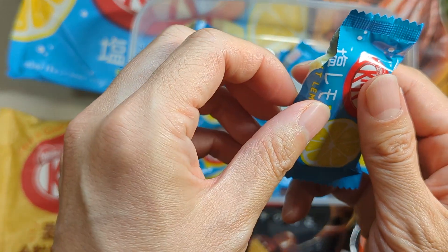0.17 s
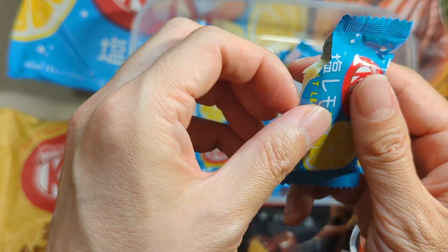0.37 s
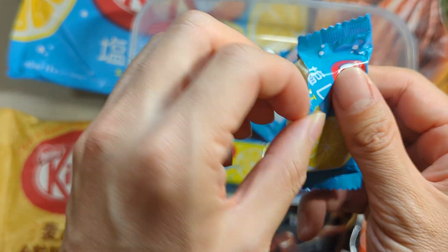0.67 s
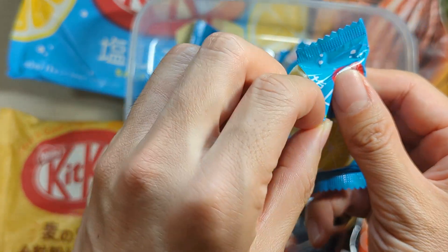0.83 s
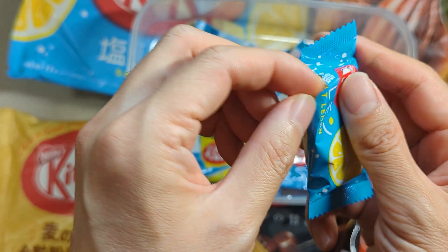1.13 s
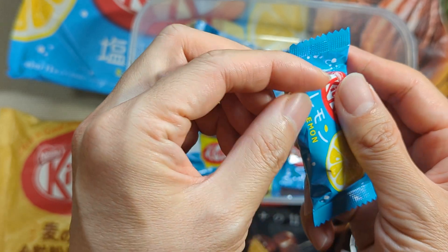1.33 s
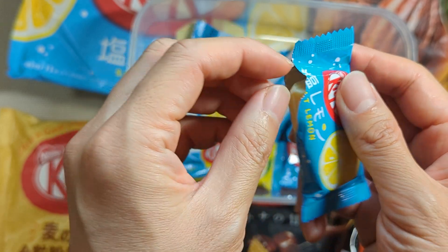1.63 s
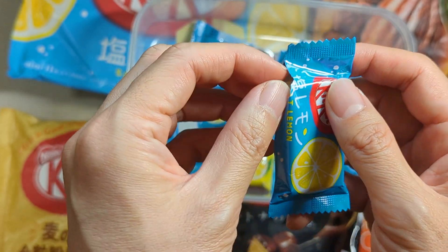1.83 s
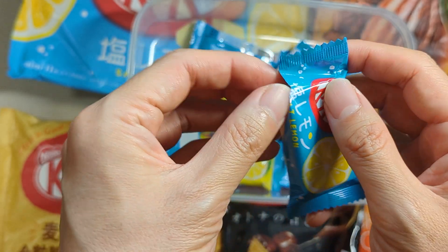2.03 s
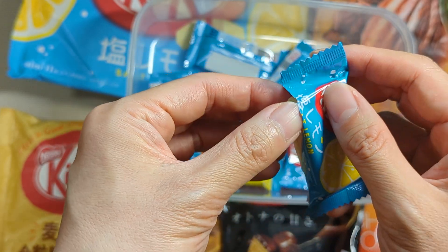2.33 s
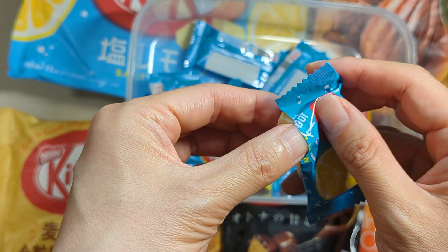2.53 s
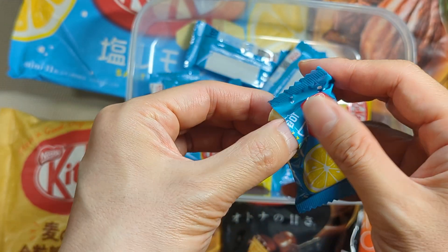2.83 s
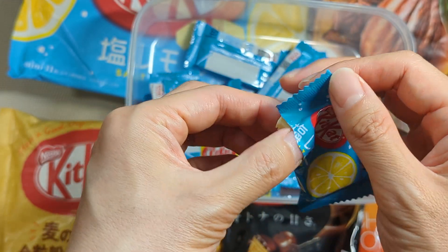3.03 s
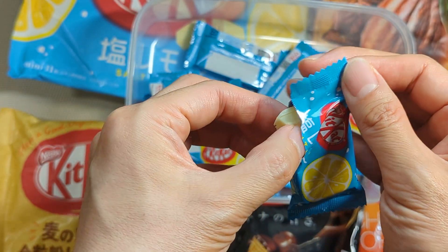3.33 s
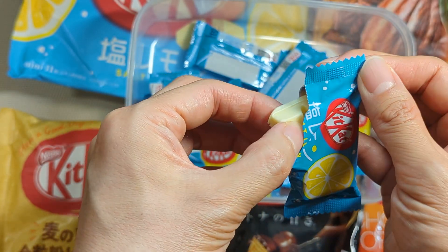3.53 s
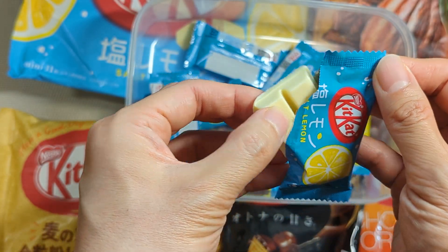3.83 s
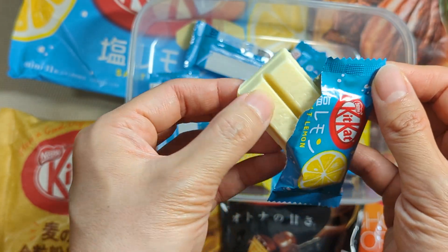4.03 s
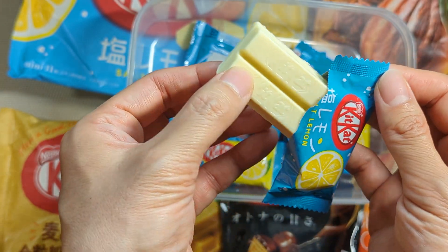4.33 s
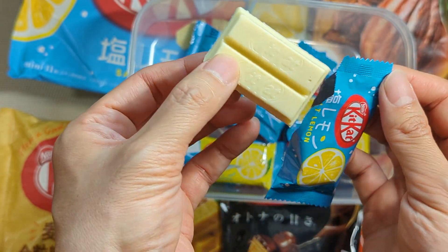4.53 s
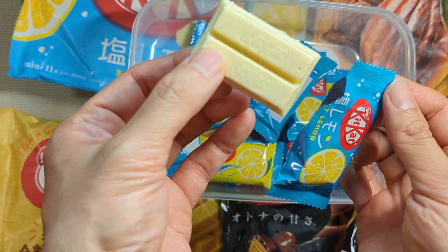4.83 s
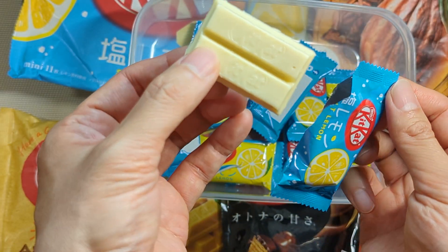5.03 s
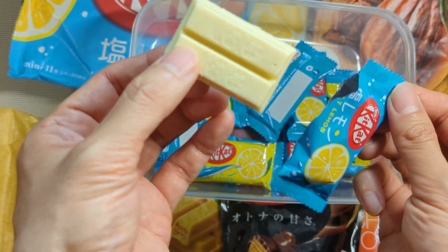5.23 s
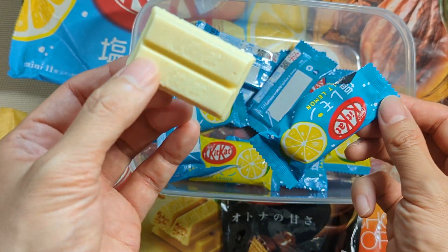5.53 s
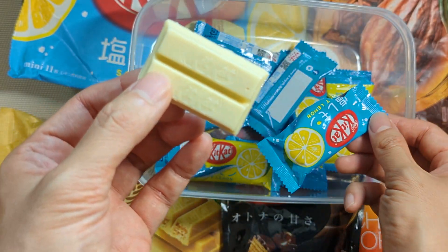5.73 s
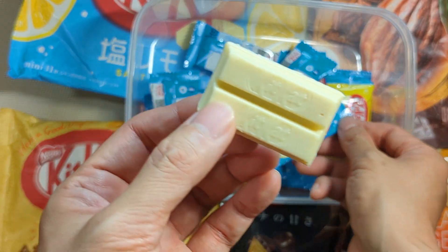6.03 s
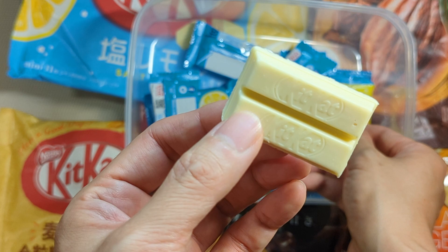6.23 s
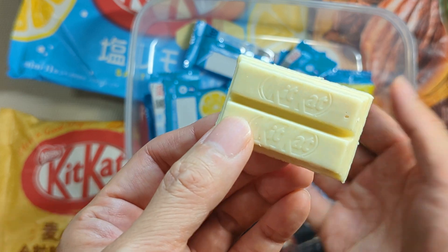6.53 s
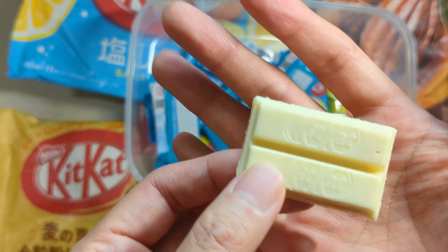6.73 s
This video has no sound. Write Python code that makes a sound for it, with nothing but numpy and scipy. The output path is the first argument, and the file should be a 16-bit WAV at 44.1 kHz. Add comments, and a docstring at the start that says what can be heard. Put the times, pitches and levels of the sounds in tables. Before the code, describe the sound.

A small plastic snack wrapper is handled close to a stereo microphone. For the first 1.4 seconds, fingers make light, irregular crinkles and crisp ticks, then ease off briefly. From about 2.1 seconds the film tears in short, raspy pulls, with two sharp, bright snaps near 2.5 seconds. Fine crackling continues and peaks in a cluster of loud snaps between 3.2 and 3.6 seconds. The crinkling grows duller and softer as the candy bar slides out, dying away by about 4.7 seconds. A single sharp crackle comes at 5.1 seconds and a smaller one near 5.9. Around 6.2 to 6.4 seconds the empty wrapper drops into a plastic box with a few snaps and a brief rustle. The room is small and dry, and a faint, low ventilation hum runs underneath, remaining alone at the end.

```python
"""Fingers tear open a small plastic snack wrapper close to a stereo microphone, slide the bar out and drop the wrapper into a box.
Creases in the film buckle with sharp snaps, each ringing its own little facet; tearing and sliding make a fine dense crackle.
Hands and table scatter the sound, and a small dry room with a low ventilation hum answers."""
import sys
import numpy as np
from scipy import signal
from scipy.fft import rfft, irfft, next_fast_len
from scipy.io import wavfile
from scipy.ndimage import uniform_filter1d

SR = 44100
rng = np.random.default_rng(int(sys.argv[2]) if len(sys.argv) > 2 else 0)


def to_wav(sig):
    """Store sig (one row per channel, or 1-D mono) as 16-bit WAV at the path in sys.argv[1].

    Samples outside -1..1 are clipped; the rate is SR.
    """
    pcm = np.clip(np.atleast_2d(sig), -1, 1) * 32767
    pcm = np.round(pcm).astype(np.int16)
    wavfile.write(sys.argv[1], SR, pcm.T)  # frames by channels


N = 303849

# the big creases buckle, and the wrapper knocks against the box and lands in it: (s, level dB, lowest Hz that
# the facet radiates, ring Hz, ring dB)
SNAPS = [(0.1597, -40, 3000, 5600, 11), (0.3443, -53, 700, 11000, 8), (0.3669, -31, 1250, 1900, 16), (0.4402, -47, 990, 11000, 10.5),
         (0.553, -44, 2406, 9100, 16.5), (0.5847, -34.5, 2700, 9700, 6), (0.6092, -32.5, 3500, 12200, 11),
         (0.6527, -38.5, 3850, 11300, 8), (0.6895, -48, 1800, 6500, 8), (0.734, -34.5, 1200, 6300, 2),
         (0.7382, -32.5, 630, 6250, 10), (0.7415, -36, 800, 750, 10), (0.757, -33, 1000, 1400, 21), (0.7816, -35.5, 675, 11900, 5),
         (0.8147, -36, 784, 11710, 18.5), (0.8575, -42.5, 1500, 1940, 17), (0.898, -40, 3240, 7000, 2.5),
         (0.9352, -47, 800, 12000, 10), (0.98, -36.5, 1480, 1650, 14), (1.0857, -30.5, 1200, 6440, 6.5), (1.0945, -30.5, 4370, 9220, 13), (1.1064, -36.5, 2800, 5930, 0),
         (1.231, -37.5, 1490, 9000, 17), (1.2612, -32.5, 882, 1570, 11.5), (1.3458, -33, 1120, 7730, 8.5),
         (1.4642, -43, 2080, 10400, 13.5), (1.7117, -50, 3025, 6900, 10), (1.777, -43, 920, 9700, 17),
         (2.113, -37.5, 770, 6310, 4.5), (2.1271, -34.5, 2284, 2200, 20), (2.1688, -34.5, 1050, 980, 7),
         (2.179, -33.5, 950, 980, 8), (2.1927, -33, 1000, 950, 9), (2.198, -32, 1000, 4200, 8), (2.2601, -34, 1482, 4470, 10.5),
         (2.3235, -37.5, 1770, 3726, 0), (2.3902, -43.5, 1765, 8890, 12), (2.4357, -34, 2680, 7310, 2),
         (2.4529, -16.5, 4930, 8500, 17), (2.4724, -18, 1600, 8500, 8), (2.886, -34.5, 3760, 7500, 3),
         (2.9159, -34, 2410, 8420, 22), (3.0022, -33, 1400, 3500, 9), (3.011, -38, 1300, 1250, 12), (3.0423, -36.5, 1400, 6690, 13),
         (3.0596, -32, 1506, 12000, 8.5), (3.1373, -43, 3910, 6700, 3), (3.1765, -35, 1106, 4560, 6.5),
         (3.2284, -25, 3400, 7500, 0), (3.28, -26.5, 2650, 11000, 8.5), (3.432, -14.5, 4490, 934, 4),
         (3.436, -17.5, 1500, 6140, 18), (3.4399, -20.5, 2060, 2390, 9), (3.5388, -19, 1592, 6800, 12.5),
         (3.6126, -24.5, 4150, 4530, 10.5), (3.6709, -36, 1150, 2420, 8.5), (3.6907, -35.5, 1328, 3990, 7),
         (3.723, -33, 4000, 4710, 4.5), (3.7411, -31, 3600, 3700, 5), (3.754, -34, 3264, 2580, 15),
         (3.777, -37.5, 2430, 2377, 2), (3.8213, -34, 1898, 2480, 1.5), (3.8412, -32.5, 1815, 6250, 0),
         (3.8859, -29, 2600, 2370, 8.5), (3.9046, -32, 2130, 7700, 4), (3.924, -32.5, 3955, 3850, 9),
         (4.0016, -25.5, 3300, 4100, 8.5), (4.069, -46.5, 1810, 3672, 13), (4.1302, -34.5, 3394, 3610, 16),
         (4.22, -41, 1690, 2830, 3), (4.365, -45, 2080, 3650, 7), (4.491, -49, 2470, 4090, 12),
         (4.5723, -50, 1520, 1840, 4), (4.714, -43.5, 2500, 4020, 6.5), (5.1035, -41.5, 2650, 4300, 13),
         (5.141, -22, 2700, 5530, 11), (5.64, -57, 2100, 5950, 6), (5.8635, -28.5, 2510, 10400, 18.5),
         (5.9003, -32, 1454, 4300, 0.5), (6.1869, -26, 1700, 7560, 17), (6.236, -45.5, 3000, 4100, 3.5), (6.2502, -20.5, 3400, 2450, 16), (6.2512, -39, 1200, 940, 18.5),
         (6.3094, -38, 1300, 5120, 4.5), (6.359, -49, 1600, 3103, 5.5)]
# colour of the fine crackle: (Hz, dB)
FILM = [(400, -17.5), (700, -8), (1000, -6.5), (1400, -6.5), (2000, -5), (2900, -7.5), (4000, -4), (5300, -9.5), (6500, -7), (8000, -8.5), (9200, -6.5), (12000, -11.5), (16000, -20.5)]
# room background: (Hz, dB per Hz)
AIR = [(22, -60), (31, -30), (46, -3), (60, -9.5), (100, 0), (135, -9.5), (200, -6.5), (255, -12.5), (350, -7), (450, -11), (700, -19), (1200, -28.5), (2500, -34.5), (6000, -39.5), (16000, -45)]
AIR_DB = -60.5
# ventilation hum: (Hz, dB)
HUM = [(92, -73), (161.5, -71.5), (333.5, -74)]
# the small dry room: decay (s) and level against the direct click (dB)
ROOM_T60_S, ROOM_DB = 0.15, -10
SPLIT_HZ = 4000  # fixed
TOP_HZ = 15900  # fixed
# body colour of the whole packet, shared by every facet: (Hz, dB)
PACKET = [(300, 5), (600, 3), (950, -1), (1300, -4.5), (1600, -2.5), (2100, 2.5), (2900, -2.5), (4000, 1), (5100, -0.5), (6200, 3), (8000, 1), (12000, 2.5), (16000, -1)]
# a harder snap is brighter, a facet that radiates low notes well has a flatter spectrum:
# the usual snap, and the change of tilt (dB per octave) per dB of level and per octave of the lowest Hz
USUAL_SNAP_DB, USUAL_LOW_HZ = -34, 2060
# lag of the right port (ms) as the wrapper moves from the hands down into the box, and its scatter between facets: (s, ms)
PORT_LAG = [(0, 0.056), (3.2, 0.045), (3.5, 0.028), (4.5, 0.072), (5.1, -0.042), (6.3, 0.023)]
LAG_SCATTER_MS = 0.024
# pulls that tear the film, slide it off the bar or brush it into the box: (start s, length s, level dB, crispness = treble minus body dB)
PULLS = [(0.191, 0.026, -80, 5), (0.309, 0.02, -77, 14), (0.475, 0.025, -83, 8), (0.565, 0.1, -77, 7), (0.746, 0.018, -66, 1),
         (0.821, 0.013, -70, 18), (0.935, 0.2, -66.5, 3), (1.189, 0.075, -60, 5), (1.74, 0.08, -71.5, 0), (1.777, 0.016, -60.5, 0),
         (1.871, 0.027, -79, 9), (2.001, 0.033, -78, -1), (2.109, 0.033, -58, -8), (2.158, 0.04, -49.5, -0.5), (2.263, 0.015, -55, -3),
         (2.326, 0.083, -59, -1.5), (2.496, 0.084, -62, -5.5), (2.678, 0.14, -69.5, -0.5), (2.818, 0.14, -61.5, 0.5), (2.921, 0.019, -60.5, 8),
         (2.99, 0.026, -48.5, -15.5), (3.042, 0.03, -60, 1.5), (3.18, 0.16, -64, 0.5), (3.415, 0.13, -58, -0.5), (3.59, 0.1, -65.5, 2),
         (3.724, 0.049, -59, -6), (3.888, 0.05, -58, 1.5), (4.019, 0.052, -64.5, -15.5), (4.129, 0.028, -65.5, -19.5), (4.345, 0.027, -68, -15),
         (6.265, 0.03, -56.5, -7.5), (6.309, 0.07, -68, -9)]
# each pull builds up and lets go by 20 dB in these times
PULL_ATTACK_S, PULL_RELEASE_S = 0.03, 0.065
# between pulls the held film stirs faintly, until the bar is out
HELD_DB, HELD_CRISP_DB, BAR_OUT_S = -81, -5.5, 4.65
TILT_DB = None
TILT_PER_DB, TILT_PER_OCTAVE = 0.305, 3.0
# usual tilt of a snap, bright while the film is taut and duller as it goes slack: (s, dB per octave)
FILM_TILT = [(0.1, -3.5), (1.1, -4), (2.2, -5), (3.2, -5), (3.7, -5.5), (4.3, -7.5), (5.5, -3.5), (6.3, -6)]
# small creases give way during the pulls: rate, level over the pull and its spread, ranges of the lowest Hz and the ring
SMALL_PER_S, SMALL_DB, SMALL_SPREAD_DB = 22, 16, 1.5
SMALL_LOW_HZ, SMALL_RING_HZ, SMALL_RING_DB = (900, 2800), (3000, 14000), 12.5


def undb(db):
    """Decibels to gain."""
    return 10 ** (np.asarray(db) / 20)


def unit(x):
    """Scale to rms 1."""
    return x / np.sqrt(np.mean(x ** 2))


def spectrum_db(points, hz):
    """Join (Hz, dB) points on a log-frequency axis."""
    at, db = np.transpose(points)
    return np.interp(np.log(hz + 1), np.log(at), db)


def colour(x, points):
    """Filter by a (Hz, dB) spectrum."""
    size = next_fast_len(N)
    return irfft(rfft(x, size) * undb(spectrum_db(points, np.fft.rfftfreq(size, 1 / SR))), size)[..., :N]


def causal(db):
    """Shortest causal response with this dB spectrum, by folding the cepstrum."""
    cep = irfft(np.log(undb(db)))
    half = len(cep) // 2
    cep[1:half] *= 2
    cep[half + 1:] = 0
    return np.exp(rfft(cep))


def tail(t60_s, rise_s, size, channels=2):
    """Dense echoes that build up and die away; energy 1 in each channel."""
    t = np.arange(size) / SR
    y = rng.standard_normal((channels, size)) * undb(-60 * t / t60_s) * (1 - np.exp(-t / rise_s))
    return y / np.sqrt(np.sum(y ** 2, axis=1, keepdims=True))


def facet(low_hz, tilt_db, ring_hz, ring_db, lag_ms, flutter_db, scatter_db, modes_db=7, mode_width_hz=80, leak_db=-27, beam_share=0.27, count=9, size=6144):
    """One patch of film flips over, as the two ports hear it in the room; the direct click has rms 1 over a millisecond."""
    hz = np.fft.rfftfreq(size, 1 / SR) + 1
    # a small patch hardly radiates long waves; only a little leaks out through the packet
    small = 10 * np.log10(1 / (1 + (low_hz / hz) ** 6) + undb(leak_db) ** 2 / (1 + (350 / hz) ** 4))  # fixed
    slope = tilt_db * np.log2(np.maximum(hz, 800) / SPLIT_HZ)
    ring = ring_db / (1 + ((hz - ring_hz) / (300 + 0.1 * ring_hz)) ** 2)
    # the crumpled packet has narrow modes that shift with every new fold
    mode_hz = 900 * 13 ** rng.random((count, 1))  # fixed
    modes = modes_db * np.max(1 / (1 + ((hz - mode_hz) / mode_width_hz) ** 2), axis=0)
    click = causal(small + slope + ring + modes + spectrum_db(PACKET, hz))
    click = click / np.sqrt(np.sum(irfft(click * (hz < TOP_HZ)) ** 2))
    # bending waves run round the packet and smear the click
    flutter = 1 + undb(flutter_db) * rfft(tail(0.0043, 0.00051, size, channels=1))
    delay_ms = .2 + np.array([[-.5], [.5]]) * lag_ms  # fixed
    direct = flutter / np.hypot(1, undb(flutter_db)) * np.exp(-2j * np.pi * hz * delay_ms / 1000)  # fixed
    # hands and table scatter it first, the room follows; the ring is beamed, so these echoes carry less of it
    echoes = undb(scatter_db) * tail(0.052, 0.00024, size) + undb(ROOM_DB) * tail(ROOM_T60_S, 0.0086, size)
    fade = np.minimum(np.linspace(8, 0, size), 1) ** 2  # fixed
    return fade * irfft(click * (direct + undb(-beam_share * ring) * rfft(echoes))) * np.sqrt(SR / 1000)  # fixed


def snaps(gain_db=-0.92, swell_db=-12, swell_t60_s=.016, size=512):
    """The creases buckle and the wrapper knocks, one by one; each click swells for an instant before its peak."""
    out = np.zeros((2, N + SR))
    for s, db, low_hz, ring_hz, ring_db in list(SNAPS) + small_creases():
        tilt_db = np.interp(s, *np.transpose(FILM_TILT)) + TILT_PER_DB * (db - USUAL_SNAP_DB)
        tilt_db -= TILT_PER_OCTAVE * np.log2(low_hz / USUAL_LOW_HZ)
        lag_ms = np.interp(s, *np.transpose(PORT_LAG)) + LAG_SCATTER_MS * rng.standard_normal()
        push = undb(swell_db) * tail(swell_t60_s, .0001, size, channels=1)[:, ::-1]
        push[0, -1] = 1
        y = facet(low_hz, tilt_db, ring_hz, ring_db, lag_ms, flutter_db=-3.5, scatter_db=-1.5)  # fixed
        y = signal.fftconvolve(y, push, axes=1)
        start = int(s * SR) - size + 1
        out[:, start:start + y.shape[1]] += undb(db + gain_db) * y
    return out[:, :N]


def crackle(per_s=750, spread_db=1.5, body_db=-1, crisp_db=-1, usual_db=-62, crowding=.5, shift_db=1.5, count=12):
    """Tiny slips and breaks along the tear, mostly faint, shared among facets of different pitch."""
    s, *columns = pulls()
    t = np.arange(N) / SR
    db, crisp = (np.interp(t, s, c) for c in columns)
    # a hard pull breaks the film in more places at once: lone ticks crowd into a rasp
    density = np.clip(undb(crowding * (db + np.maximum(crisp, 0) - usual_db)), .25, 6)  # fixed
    grains = 0
    for ring_hz in np.geomspace(950, 13000, count):
        at = np.flatnonzero(rng.random(N) < density * per_s / count / SR)
        luck = rng.random((4096, 2))[np.arange(len(at)) % 4096]  # fixed
        # facets tighten and slacken as the fingers move, so the colour keeps shifting
        tension_db = shift_db * np.interp(at, np.linspace(0, N, num=120), rng.standard_normal(size=120))
        size_db = spread_db * np.minimum(-np.log(1 - luck[:, 0]), 4) + tension_db
        slips = np.zeros((1, N))
        slips[0, at] = np.sign(luck[:, 1] - .5) * undb(size_db) / np.sqrt(density[at])
        ring = facet(450, 0, ring_hz, 6.1, 0.068, flutter_db=0.5, scatter_db=4.5)
        grains = grains + signal.oaconvolve(slips, ring, axes=1)[:, :N]
    grains = colour(grains, FILM)
    body = signal.sosfiltfilt(signal.butter(2, SPLIT_HZ, fs=SR, output="sos"), grains)
    return undb(db) * (undb(body_db) * unit(body) + undb(crisp + crisp_db) * unit(grains - body))




def ventilation(waver=0.013):
    """Low rush of air with wavering hum lines; long waves reach both ports alike."""
    mid = colour(rng.standard_normal(N), AIR)
    side = colour(colour(rng.standard_normal(N), AIR), [(50, -13.5), (200, -15), (500, -8), (1500, 0.5), (4000, 1)])
    air = undb(AIR_DB) * unit(mid + np.array([[1], [-1]]) * side)
    for hz, db in HUM:
        drift = unit(uniform_filter1d(rng.standard_normal(N), size=3000))
        air = air + undb(db) * unit(np.sin(2 * np.pi * np.cumsum(hz * (1 + waver * drift)) / SR))
    return air


def suppress(x, open_db=5, depth_db=9, from_hz=900, size=1024, count=25):
    """Noise suppression: treble that is hardly above its own steady background is turned down."""
    hz, _, z = signal.stft(x, SR, nperseg=size, noverlap=3 * size // 4)  # fixed
    power = uniform_filter1d(np.mean(np.abs(z) ** 2, axis=0), count, axis=0) + 1e-18
    over_db = 10 * np.log10(power / np.percentile(power, 15, axis=1, keepdims=True))  # fixed
    shut = .5 - .5 * np.tanh((over_db - open_db) / 2)
    treble = hz[:, None] ** 4 / (hz[:, None] ** 4 + from_hz ** 4)  # fixed
    return signal.istft(z * undb(-depth_db * shut * treble), SR, nperseg=size, noverlap=3 * size // 4)[1][:, :N]  # fixed


def pulls(size=6000):
    """Level and crispness of the rustle over time: each pull builds up, holds and lets go."""
    s = np.linspace(0, N / SR, size)
    start, length, db, crisp = np.transpose(PULLS)[..., None]
    db = db - 20 * (np.maximum(start - s, 0) / PULL_ATTACK_S + np.maximum(s - start - length, 0) / PULL_RELEASE_S)
    held_db = HELD_DB - 20 * np.maximum(s - BAR_OUT_S, 0) / PULL_RELEASE_S
    body = 10 * np.log10(undb(held_db) ** 2 + np.sum(undb(db) ** 2, axis=0))
    treble = 10 * np.log10(undb(held_db + HELD_CRISP_DB) ** 2 + np.sum(undb(db + crisp) ** 2, axis=0))
    return s, body, treble - body


def small_creases(count=140):
    """Lesser snaps at random moments, as strong as the pull that causes them; rows as in SNAPS."""
    s, db, _ = pulls()
    luck = rng.random((count, 5))
    at = np.cumsum(2 * luck[:, 0]) / SMALL_PER_S
    level = np.interp(at, s, db) + SMALL_DB + SMALL_SPREAD_DB * (2 * luck[:, 1] - 1)
    low_hz = SMALL_LOW_HZ[0] * (SMALL_LOW_HZ[1] / SMALL_LOW_HZ[0]) ** luck[:, 2]
    ring_hz = SMALL_RING_HZ[0] + (SMALL_RING_HZ[1] - SMALL_RING_HZ[0]) * luck[:, 3]
    ring_db = SMALL_RING_DB * (.5 + luck[:, 4])
    return np.column_stack([at, level, low_hz, ring_hz, ring_db])[at < BAR_OUT_S].tolist()


def scene(left_db=0.5):
    """The wrapper, slightly left of centre, over the room's hum."""
    wrapper = (snaps() + crackle()) * undb(np.array([[left_db], [-left_db]]))
    return wrapper + ventilation()


def record(dry):
    """The recorder suppresses faint hiss and cuts the top."""
    quiet = suppress(dry)
    return signal.sosfilt(signal.ellip(10, .2, 70, TOP_HZ, fs=SR, output="sos"), quiet)  # fixed


dry = scene()
out = record(dry)
to_wav(out)
```